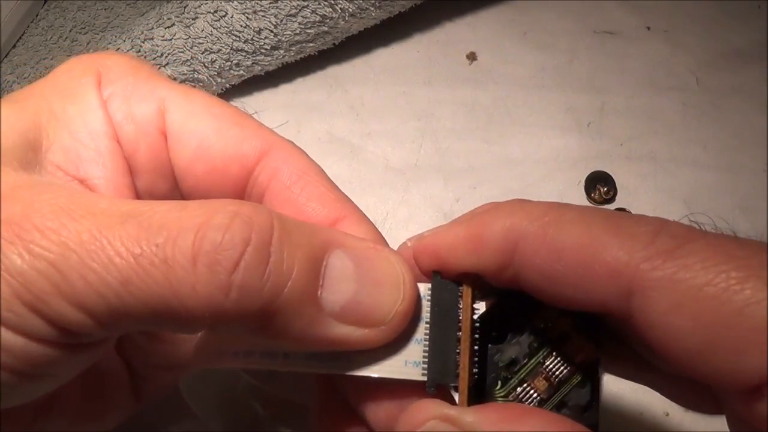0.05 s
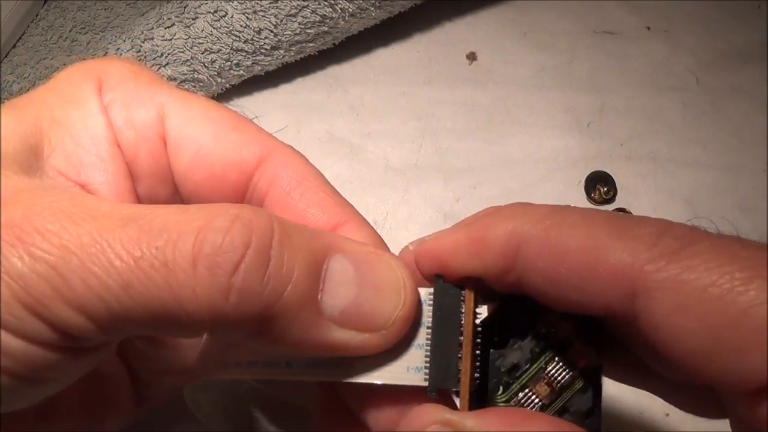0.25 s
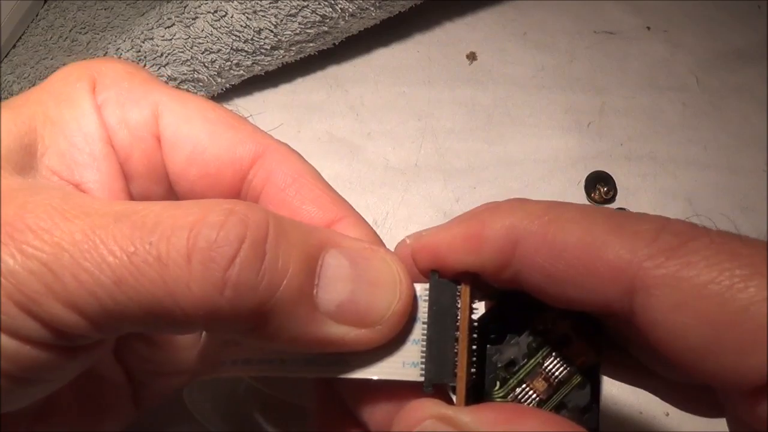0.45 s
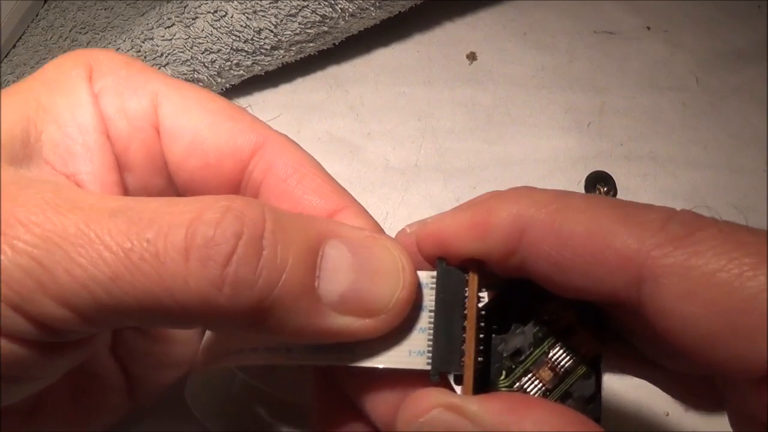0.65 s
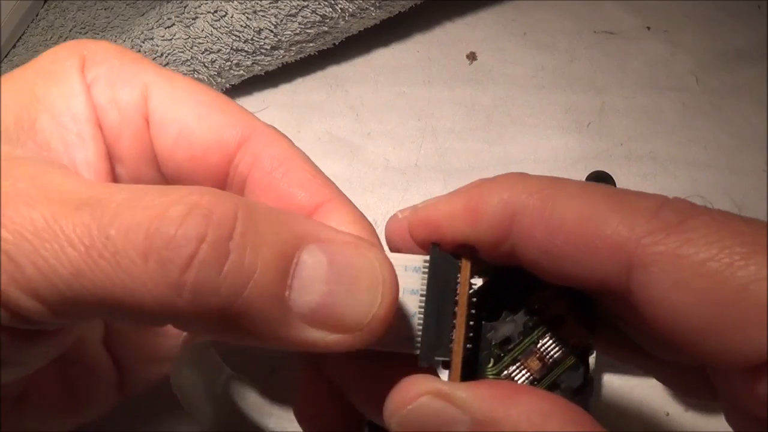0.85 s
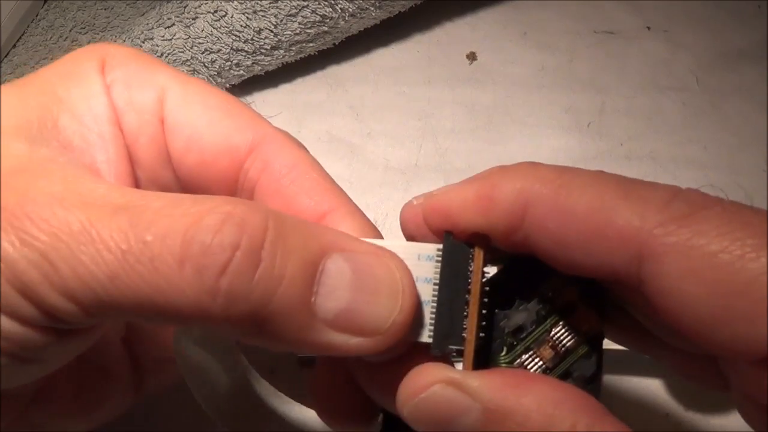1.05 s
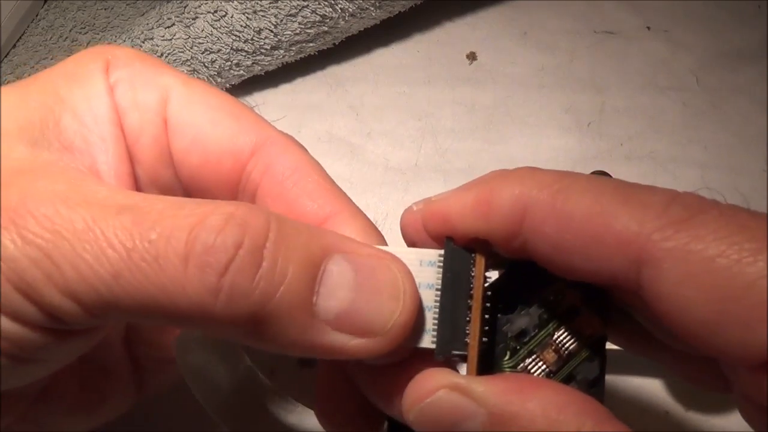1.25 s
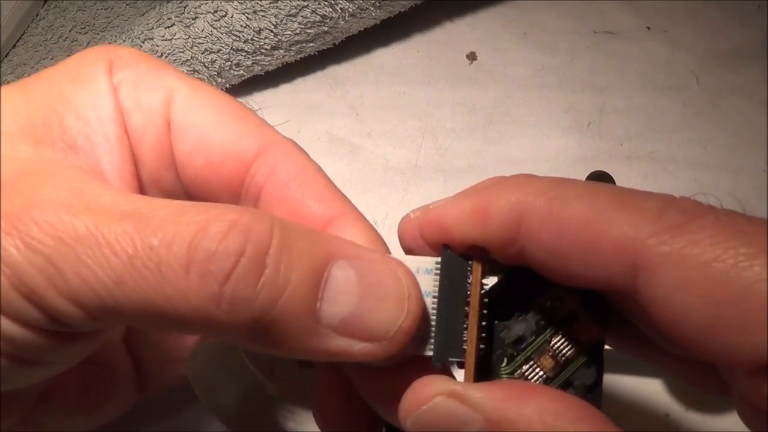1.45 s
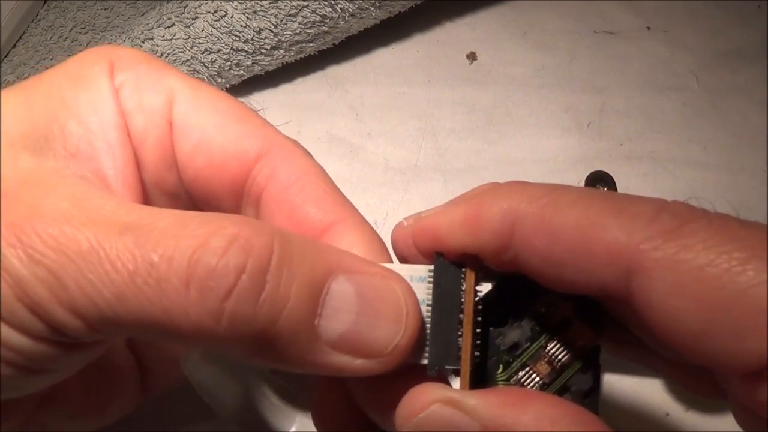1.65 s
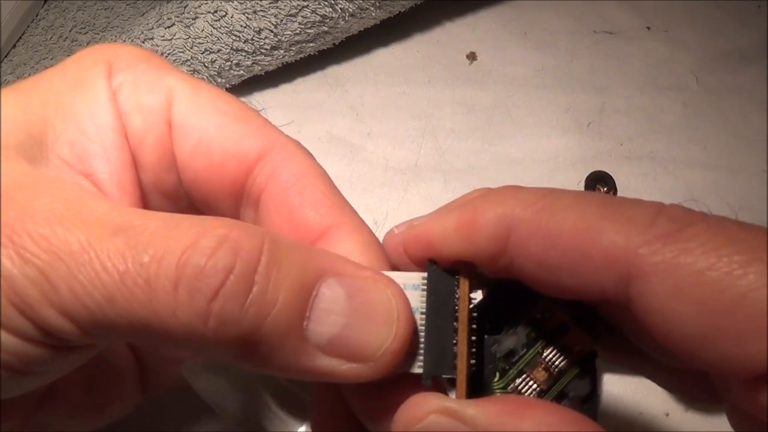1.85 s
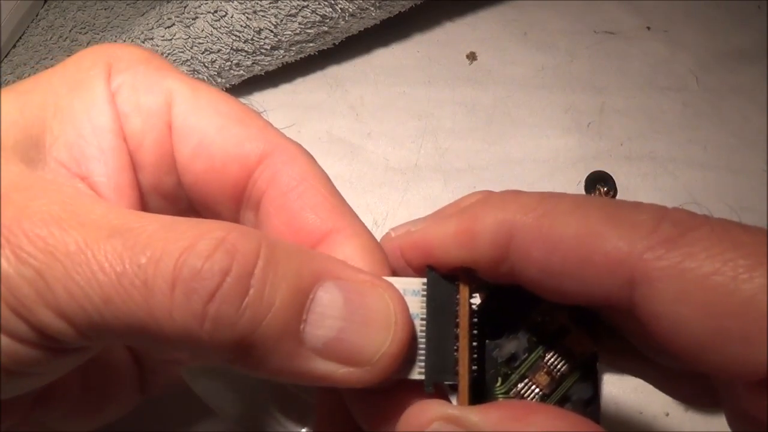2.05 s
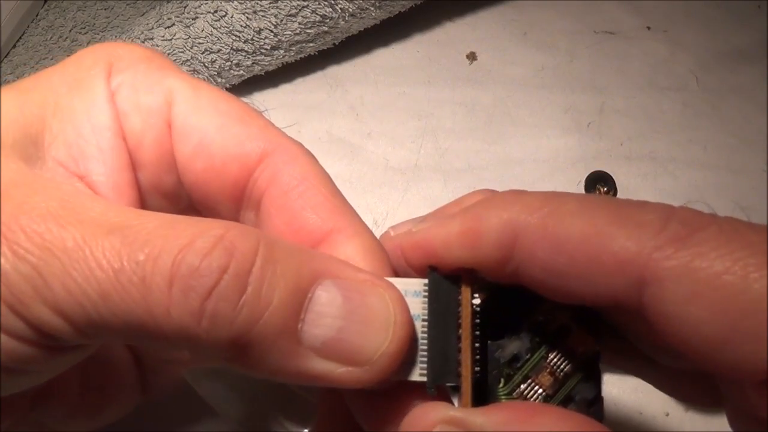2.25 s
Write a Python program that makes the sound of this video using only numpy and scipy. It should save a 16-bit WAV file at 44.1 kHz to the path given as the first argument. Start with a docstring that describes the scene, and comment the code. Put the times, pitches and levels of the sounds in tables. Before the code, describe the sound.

Plastic cable latch snaps once, followed by tiny scratchy slips and crisp ticks, close in a quiet room

```python
"""Ribbon cable in a board connector

Fingers work a flat ribbon cable in a small circuit-board connector, close to the microphone in a quiet room.
The plastic latch snaps once, a click with a brief noisy ring; the cable ticks and creaks in stick-slip runs of clicks.
It scrapes through the slot in three strokes of grains and hiss, with rustle, gliding bands and a thin tone.
Damped modes make soft knocks on the board, over a low rub of skin, a steady noise floor and a faint hum."""
import sys
import numpy as np
from scipy import signal
from scipy.fft import rfft, irfft, next_fast_len
from scipy.io import wavfile
from scipy.ndimage import map_coordinates

SR = 44100
rng = np.random.default_rng(int(sys.argv[2]) if len(sys.argv) > 2 else 0)


def dump_mix(stems):
    """Bounce the given channels to the path in sys.argv[1] as a 16-bit WAV at rate SR."""
    frames = np.atleast_2d(stems).T  # one column per channel
    limited = np.clip(frames, -1, 1)  # hard clip at full scale
    pcm = np.round(limited * 32767).astype(np.int16)
    wavfile.write(sys.argv[1], SR, pcm)


N = 101429  # length [samples]
TOP_HZ = 11150  # upper band limit of the whole scene

# All levels are set ahead of the room, which adds its reflections on top.
SNAP_S, SNAP_DB = .2081, -6  # time and peak of the bare click
RING_DB, RING_T60_S = -13, 0.047  # the housing rings on after the snap
SNAP_LEAN_DB = 2  # right over left, times the share in SNAP_LEAN_SHARE
# spectrum of the latch snap: (frequency [Hz], level [dB])
SNAP_SPECTRUM = [(400, -40), (1000, -31.5), (1750, -25.5), (2300, -14.5), (2650, -19), (3100, -28),
                 (3700, -10), (4150, -16.5), (4800, -23), (5250, -17), (5650, -26), (6500, -13.5),
                 (7100, -10), (7500, -22), (8000, -7), (9000, -2.5), (10400, -1), (11100, -4)]
# how far the snap leans right, most of all near 3.9 kHz: (frequency [Hz], share of the lean [ratio])
SNAP_LEAN_SHARE = [(2200, 0.23), (3900, 1.5), (6000, 0.063)]

# single slips of the cable in its slot: (time [s], peak [dB])
TICK_EVENTS = [(.279, -31), (.9448, -36.5), (1.0258, -40), (1.0488, -36.5), (1.0736, -36.5), (1.114, -47),
               (1.138, -38), (1.207, -47), (1.393, -40), (1.4175, -45), (1.457, -39), (1.8223, -43.5),
               (1.8407, -30.5), (1.858, -46), (1.8625, -30), (1.8835, -36), (1.9163, -26), (1.9597, -34),
               (2.0387, -35.5), (2.1767, -34), (2.1808, -38), (2.1993, -32.5), (2.2178, -34.5),
               (2.2373, -37), (2.2405, -32), (2.2776, -31.5)]
# spectrum of a tick: (frequency [Hz], level [dB])
TICK_SPECTRUM = [(1470, -44), (2500, -25.5), (4680, -14.5), (5920, -22), (7040, -7.5), (8270, -10),
                 (10200, 1), (11000, -1.5), (14300, -55)]

# stick-slip runs: (time [s], length [s], first slip rate [1/s], last slip rate [1/s], first peak [dB],
# last peak [dB], lower ring re slip [dB], board ring re slip [dB])
CREAK_RUNS = [(.2155, 0.04, 199, 216, -34, -33, -13, -32), (0.253, .02, 505, 410, -37, -33.5, -14, -18),
              (0.947, 0.022, 920, 920, -48, -52, -5, -8), (1.333, 0.011, 1040, 800, -47, -46.5, -3.5, -17),
              (1.3822, .001, 400, 400, -39, -38, -1, -21),
              (1.7072, 0.0087, 226, 255, -39.5, -36, -14.5, -7.5),
              (1.7204, .011, 470, 330, -40, -49, -11, -7), (1.8764, 0.022, 136, 314, -41, -35, -2.5, -32),
              (1.898, 0.027, 1010, 660, -35.5, -42, -7.5, -44),
              (1.93, 0.034, 410, 360, -37.5, -37.5, -21, -29)]
SLIP_JITTER, SLIP_SCATTER_DB = .15, 2  # spread of the log interval, spread of the peak
# spectrum of the bright part of a slip: (frequency [Hz], level [dB])
SLIP_SPECTRUM = [(300, -27), (1200, -36.5), (2200, -22), (3200, -28), (5000, -17.5), (7300, -17.5),
                 (8200, -2.5), (9200, -6.5), (10100, 4), (11000, -3)]
# lower ring of the flexing cable: (frequency [Hz], level [dB])
CABLE_RING_SPECTRUM = [(1000, -69), (3500, -21), (5300, -2), (6400, 1.5), (7500, -8), (11000, -65.5)]
# ring of the board under a slip: (frequency [Hz], level [dB])
BOARD_RING_SPECTRUM = [(200, -13.5), (600, 7), (1100, -13), (1600, 3), (2200, 2), (2900, -1), (3500, 5),
                       (5000, -12.5), (9000, -25)]

# loudness of each sliding stroke, ahead of the layer levels: (time [s], level [dB])
STROKE_LEVELS = [
    [(.70, -85), (.728, -63), (.746, -93), (.796, -63.5), (.84, -80)],
    [(.975, -69), (.992, -57.5), (1.008, -57.5), (1.02, -74), (1.026, -54), (1.045, -55.5), (1.049, -45.5),
     (1.077, -44), (1.086, -49.5), (1.122, -49), (1.15, -59.5), (1.18, -84)],
    [(1.335, -57), (1.374, -56.5), (1.391, -50), (1.402, -64), (1.42, -49), (1.44, -82), (1.458, -57),
     (1.492, -75), (1.508, -65.5), (1.54, -91)],
]
GRAINS_PER_S, GRAIN_SPREAD_DB = 900, 3  # average rate, spread of grain level
SCRAPE_DB, HISS_DB = -2, -5  # grains and hiss, both re the stroke
SHEET_DB, SHEET_GROWS = -36, 0.48  # the ribbon's rustle grows more slowly than the scrape (exponent)
# spectrum of the scraping edge: (frequency [Hz], level [dB])
SCRAPE_SPECTRUM = [(2500, -24), (4600, -21), (5800, -39), (7200, -21), (7700, -9), (8700, 2.5),
                   (10300, 1.5), (11100, -7.5)]
# spectrum of the rubbed ribbon: (frequency [Hz], level [dB])
SHEET_SPECTRUM = [(150, -21), (850, -2.5), (1400, 1), (2200, -3.5), (2800, -12), (4500, -5.5),
                  (7000, -12.5)]

# ribbon resonances that move as it bends: (time [s], frequency [Hz], level [dB])
FLEX_GLIDES = [
    [(1.02, 2000, -68), (1.055, 2074, -61), (1.08, 2080, -57.5), (1.12, 2110, -76)],
    [(.985, 1480, -70), (1.08, 1562, -68), (1.16, 1476, -71)],
    [(1.35, 1474, -76), (1.394, 1534, -62.5), (1.42, 1820, -69), (1.47, 2000, -74)],
]
# thin wavering tone around the later two strokes: (time [s], frequency [Hz], level [dB])
TONE_GLIDE = [(.94, 1280, -68.5), (1.11, 1248, -62.5), (1.34, 1208, -66), (1.38, 1205, -79),
              (1.47, 1227, -70), (1.6, 1080, -74)]
FLEX_WOBBLE_HZ, TONE_WOBBLE_HZ = 220, 90  # random knots per second; more makes a wider band

# soft finger knocks on the board:
# (time [s], level ahead of the swell [dB], lower mode [Hz], upper mode [Hz], upper mode re lower [dB])
BUMP_EVENTS = [(.005, -47, 305, 704, -9), (.029, -51.5, 356, 682, 1), (0.1423, -45, 448, 730, -3),
               (.157, -43.5, 453, 738, -4), (.601, -52.5, 307, 556, -1.5), (1.172, -56, 359, 525, -3),
               (1.606, -53, 269, 445, 0.5), (1.614, -51, 277, 395, -5)]
BUMP_ATTACK_S, BUMP_T60_S, SKIN_DB = .003, 0.041, -6  # rise constant, decay, skin noise gain

# skin rubbing on the board and cable, ahead of the wobble: (time [s], level [dB])
HANDLING_LEVEL = [(0, -63.5), (.39, -71), (.46, -66.5), (.63, -69), (.72, -82.5), (.95, -71), (1.15, -64),
                  (1.25, -68.5), (1.45, -68), (1.71, -73.5), (1.8, -76.5)]
# spectrum of skin noise, in rub and knocks: (frequency [Hz], level [dB])
SKIN_SPECTRUM = [(170, -15.5), (270, 0.5), (470, 0.5), (800, -7.5), (1400, -13), (4000, -47)]
HANDLING_WOBBLE_DB, HANDLING_WOBBLE_HZ = 1.23, 45.37  # rms depth, random knots per second

DESK_DB, DESK_T60_S = -6.5, 0.011  # scatter off hands and desk
# decay of the room tail: (frequency [Hz], t60 [s])
ROOM_DECAY = [(300, 0.24), (3000, 0.23), (10000, 0.1)]
# room tail re the direct sound: (frequency [Hz], level [dB])
ROOM_TAIL_LEVEL = [(300, -12), (3000, -10), (10000, -12)]

FLOOR_DB, HUM_HZ = -61, 45  # rms of the noise floor, hum pitch
# spectrum of room air and microphone hiss: (frequency [Hz], level [dB])
FLOOR_SPECTRUM = [(15, -11), (45, -2), (190, -4), (300, -3), (1300, -6), (3000, -7.5), (5500, -11),
                  (11000, -14.5)]
# likeness of the floor in the two channels: (frequency [Hz], correlation [ratio])
FLOOR_LIKENESS = [(60, 0.97), (170, 0.86), (500, 0.19), (1430, 0.01), (4130, 0.53), (11900, 0.83)]
# the low hum fades: (time [s], level [dB])
HUM_LEVEL = [(.55, -74), (.75, -85.5)]


def amp(db):
    """Decibels to gain."""
    return 10 ** (np.asarray(db) / 20)


def unit(x):
    """Scale to rms 1."""
    return x / np.sqrt(np.mean(x ** 2) + 1e-20)


def along(points, hz):
    """Read (frequency, value) points on a log frequency axis."""
    f, v = np.transpose(points)
    return np.interp(np.log(hz + 1), np.log(f + 1), v)


def filtered(x, response):
    """Shape x with a gain that is a function of frequency."""
    size = next_fast_len(N + SR // 2)  # padded so the end does not wrap to the start
    hz = np.fft.rfftfreq(size, 1 / SR)
    return irfft(rfft(x, size) * response(hz), size)[..., :N]


def coloured(x, spectrum):
    """Shape x with a spectrum below the band limit, at rms 1."""
    return unit(filtered(x, lambda hz: amp(along(spectrum, hz)) * (hz < TOP_HZ)))


def add(track, s, sound):
    """Mix a sound into a track at time s."""
    i = max(0, round(s * SR))
    track[i:i + len(sound)] += sound[:max(0, N - i)]


def clicks(events, spectrum, size=1024):
    """A short minimum-phase click of the given spectrum for every (time, peak dB)."""
    hz = np.fft.rfftfreq(size, 1 / SR)
    # fold the cepstrum so all the energy comes after the onset
    cepstrum = irfft(np.log(amp(along(spectrum, hz)) + 1e-6))
    cepstrum[1:size // 2] *= 2
    cepstrum[size // 2 + 1:] = 0
    response = np.exp(rfft(cepstrum))
    # peak 1 is the envelope of the part below the band limit
    audible = irfft(response * (hz < TOP_HZ))
    click = irfft(response) / np.abs(signal.hilbert(audible)).max()
    track = np.zeros(N)
    for s, db in events:
        add(track, s, amp(db) * click)
    return track


def dying(t60):
    """A burst of noise of energy 1 that dies away exponentially."""
    t = np.arange(SR // 4) / SR
    burst = rng.standard_normal(len(t)) * 1000 ** (-t / t60)
    return burst / np.linalg.norm(burst)


def wobble(rate):
    """A smooth random curve of rms 1, with rate knots a second."""
    return unit(map_coordinates(rng.standard_normal(N), [np.arange(N) * rate / SR]))


def resonance(rows, wobble_hz):
    """A narrow band rubbed into ringing: two quadrature tones, randomly swelling, glide along the rows."""
    t = np.arange(N) / SR
    s, hz, db = np.transpose(rows)
    phase = 2 * np.pi * np.cumsum(np.interp(t, s, hz)) / SR
    ring = wobble(wobble_hz) * np.sin(phase) + wobble(wobble_hz) * np.cos(phase)
    level = amp(np.interp(t, s, db, left=-np.inf, right=-np.inf))  # silent outside the rows
    return level * unit(ring)


def latch():
    """One hard snap and the brief noisy ring of the plastic housing, a little to the right."""
    click = clicks([(SNAP_S, SNAP_DB)], SNAP_SPECTRUM)
    ring = amp(RING_DB) * signal.fftconvolve(click, dying(RING_T60_S))[:N]
    sides = np.array([[-.5], [.5]])  # left, right
    return filtered(click + ring, lambda hz: amp(SNAP_LEAN_DB * along(SNAP_LEAN_SHARE, hz) * sides))


def ticks():
    """The wiggled cable slips once at a time in its slot, each slip a short bright click."""
    return clicks(TICK_EVENTS, TICK_SPECTRUM)


def creaks():
    """The cable sticks and slips at a gliding, uneven rate; each slip also rings the cable and the board."""
    bright, lower, board = [], [], []
    for start, length, rate0, rate1, db0, db1, lower_db, board_db in CREAK_RUNS:
        t = 0
        for delay, strength in rng.standard_normal((64, 2)):
            if t > length:
                break
            progress = t / length
            db = db0 + (db1 - db0) * progress + SLIP_SCATTER_DB * strength
            bright.append((start + t, db))
            lower.append((start + t, db + lower_db))
            board.append((start + t, db + board_db))
            rate = rate0 + (rate1 - rate0) * progress
            t += np.exp(SLIP_JITTER * delay) / rate
    slips = clicks(bright, SLIP_SPECTRUM)
    return slips + clicks(lower, CABLE_RING_SPECTRUM) + clicks(board, BOARD_RING_SPECTRUM)


def scrapes():
    """Dense tiny slips over a hiss as the cable slides; the ribbon itself rustles lower down, in stereo."""
    t = np.arange(N) / SR
    stroke = np.zeros(N)
    for rows in STROKE_LEVELS:
        s, db = np.transpose(rows)
        stroke = stroke + np.interp(t, s, amp(db), left=0, right=0)
    struck = rng.random(N) < GRAINS_PER_S / SR
    grains = struck * amp(GRAIN_SPREAD_DB * rng.standard_normal(N))
    hiss = coloured(rng.standard_normal(N), SCRAPE_SPECTRUM)
    edge = amp(SCRAPE_DB) * coloured(grains, SCRAPE_SPECTRUM) + amp(HISS_DB) * hiss
    # the same grains in both channels, with separate noise in each
    rub = unit(grains - grains.mean()) + rng.standard_normal((2, N))
    sheet = coloured(rub, SHEET_SPECTRUM)
    return stroke * edge + amp(SHEET_DB) * stroke ** SHEET_GROWS * sheet


def ribbon():
    """The sliding ribbon rings in gliding bands that move as it bends, above one thin tone."""
    bands = sum(resonance(rows, FLEX_WOBBLE_HZ) for rows in FLEX_GLIDES)
    return bands + resonance(TONE_GLIDE, TONE_WOBBLE_HZ)


def bumps():
    """Fingertips knock the held board: two damped modes that depend on the grip, and a little skin noise."""
    track = np.zeros(N)
    t = np.arange(SR // 8) / SR
    fade = 1000 ** (-t / BUMP_T60_S)
    swell = 2 * (1 - np.exp(-t / BUMP_ATTACK_S)) ** 2 * fade
    for s, db, low_hz, high_hz, high_db in BUMP_EVENTS:
        low = np.sin(2 * np.pi * low_hz * t)
        high = amp(high_db) * np.sin(2 * np.pi * high_hz * t)
        skin = amp(SKIN_DB) * coloured(rng.standard_normal(N), SKIN_SPECTRUM)[:len(t)]
        add(track, s, amp(db) * swell * (low + high + skin))
    return track


def handling():
    """Skin rubs on board and cable: low noise that swells and sinks, with a small random wobble."""
    level_db = np.interp(np.arange(N) / SR, *np.transpose(HANDLING_LEVEL))
    level_db = level_db + HANDLING_WOBBLE_DB * wobble(HANDLING_WOBBLE_HZ)
    return amp(level_db) * coloured(rng.standard_normal(N), SKIN_SPECTRUM)


def room(x):
    """A quick scatter off hands and desk, then a faint tail of its own in each channel."""
    hz, t, noise = signal.stft(rng.standard_normal((2, SR // 2)), SR, nperseg=256)
    decay = 1000 ** (-t / along(ROOM_DECAY, hz)[:, None])  # each frequency dies at its own pace
    tail = signal.istft(noise * decay, SR, nperseg=256)[1]
    far = signal.fftconvolve(x, tail / np.linalg.norm(tail[0]), axes=1)[:, :N]
    near = signal.fftconvolve(x, dying(DESK_T60_S)[None], axes=1)[:, :N]
    return x + amp(DESK_DB) * near + filtered(far, lambda hz: amp(along(ROOM_TAIL_LEVEL, hz)))


def background():
    """Room air and microphone hiss as noise with a set stereo likeness, and a faint low hum."""
    def mid_side_gains(hz):
        # this angle between mid and side gives the wanted left-right correlation
        angle = np.arccos(np.clip(along(FLOOR_LIKENESS, hz), -1, 1)) / 2
        return np.array([np.cos(angle), np.sin(angle)])

    mid, side = filtered(rng.standard_normal((2, N)), mid_side_gains)
    floor = amp(FLOOR_DB) * coloured(np.array([mid + side, mid - side]), FLOOR_SPECTRUM)
    t = np.arange(N) / SR
    hum_level = amp(np.interp(t, *np.transpose(HUM_LEVEL)))
    return floor + hum_level * unit(np.sin(2 * np.pi * HUM_HZ * t))


def scene():
    """All the handling sounds placed in the room, over the quiet background."""
    cable = latch() + ticks() + creaks() + scrapes() + ribbon()
    hands = bumps() + handling()
    return room(cable + hands) + background()


def record(dry):
    """A very steep low-pass leaves almost nothing above the band limit."""
    return filtered(dry, lambda hz: 1 / np.sqrt(1 + (hz / TOP_HZ) ** 400))


dry = scene()
out = record(dry)
dump_mix(out)
```